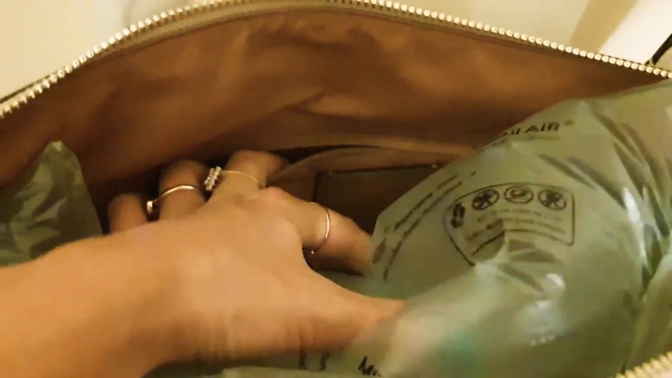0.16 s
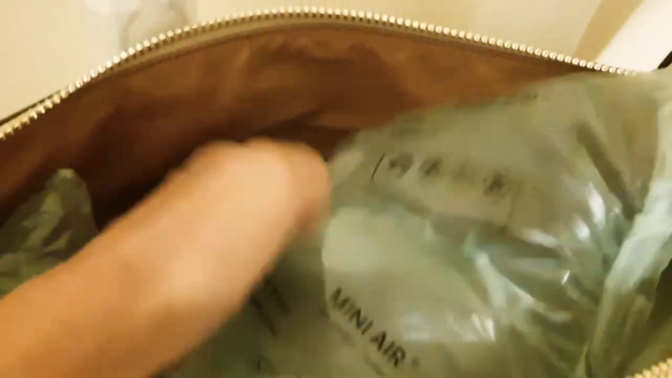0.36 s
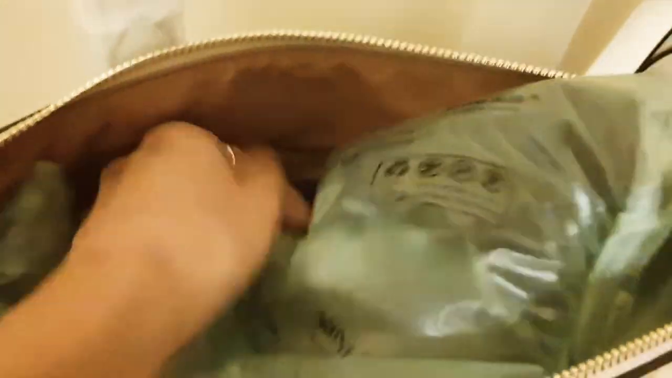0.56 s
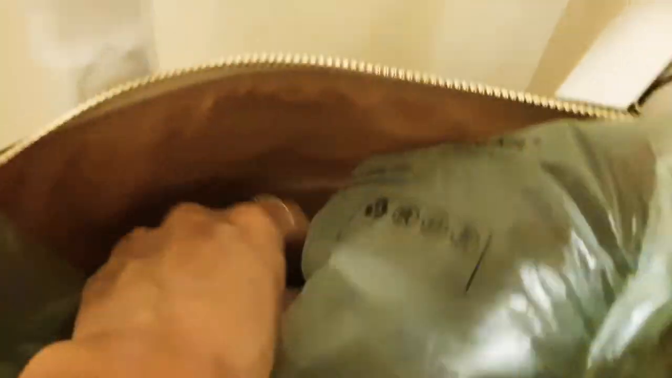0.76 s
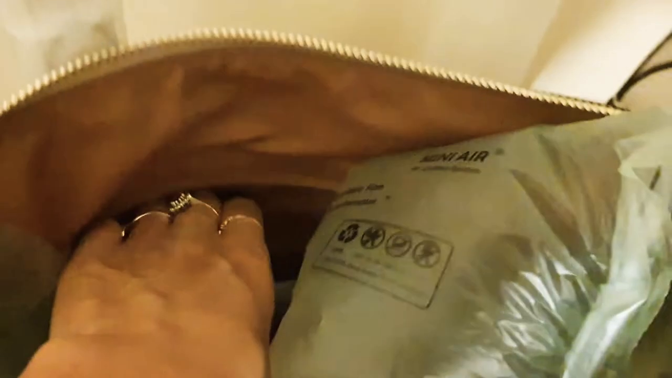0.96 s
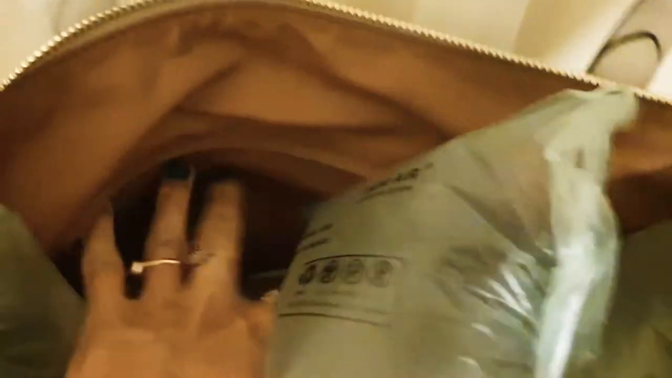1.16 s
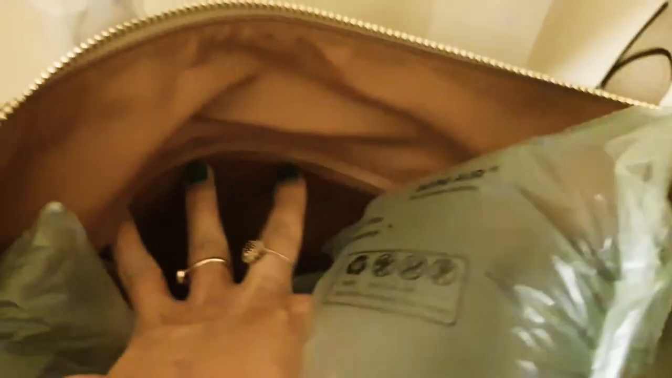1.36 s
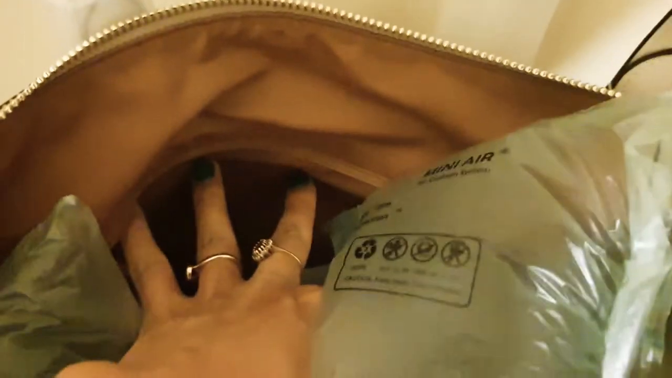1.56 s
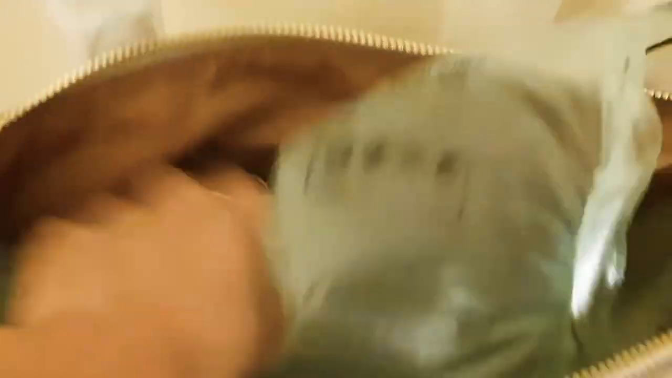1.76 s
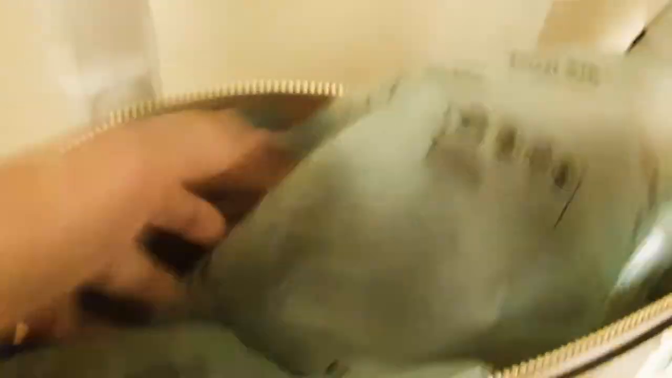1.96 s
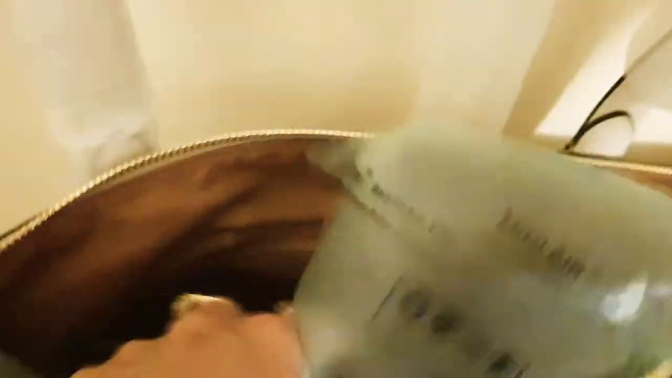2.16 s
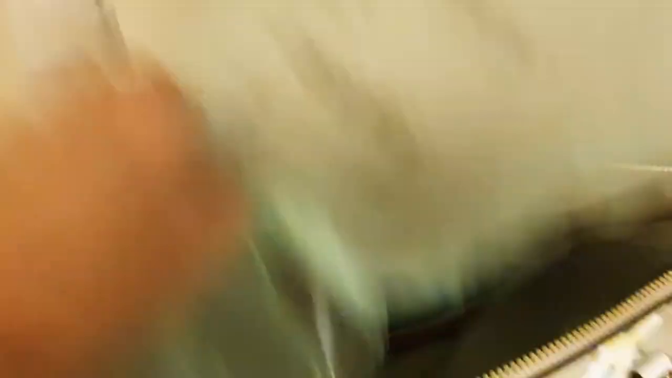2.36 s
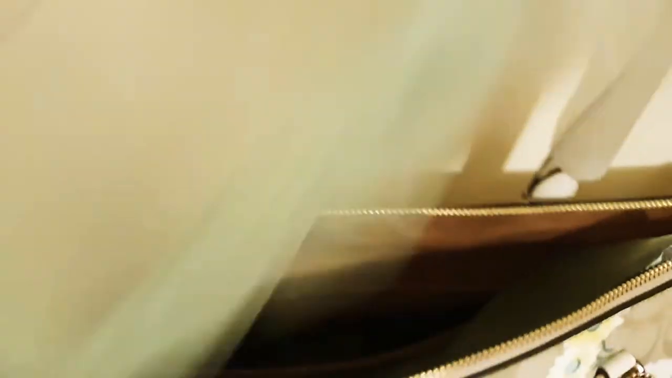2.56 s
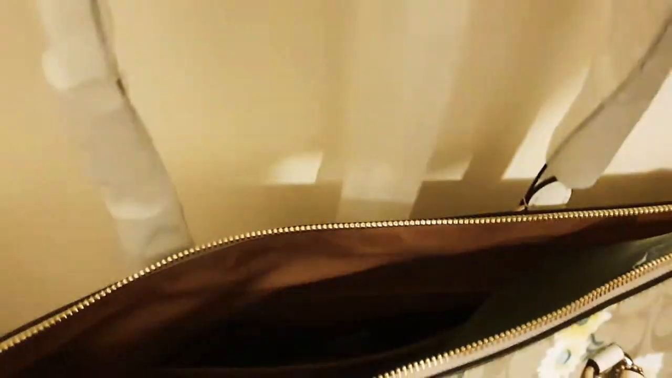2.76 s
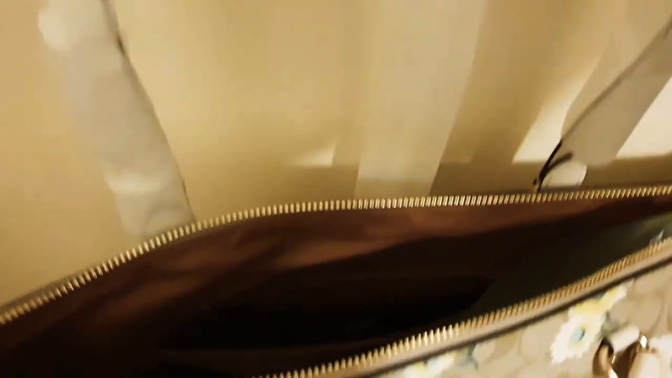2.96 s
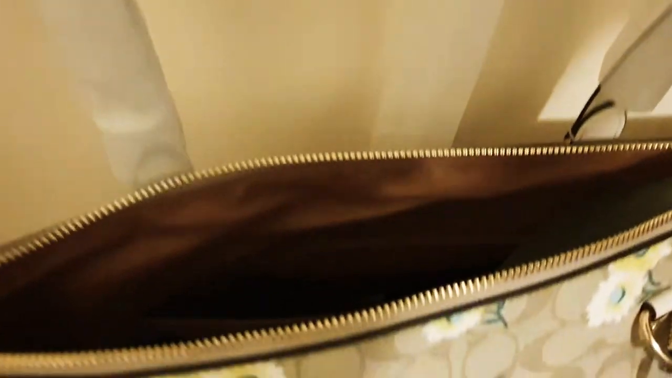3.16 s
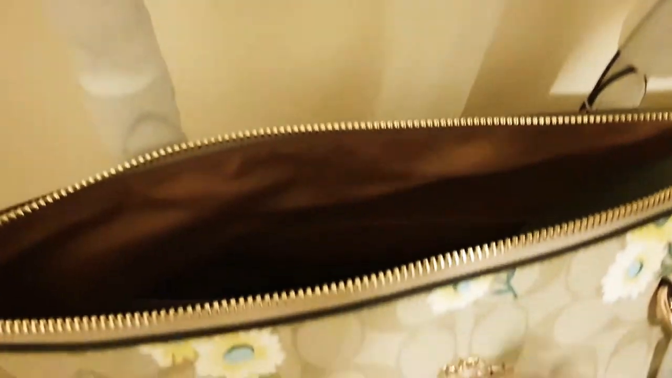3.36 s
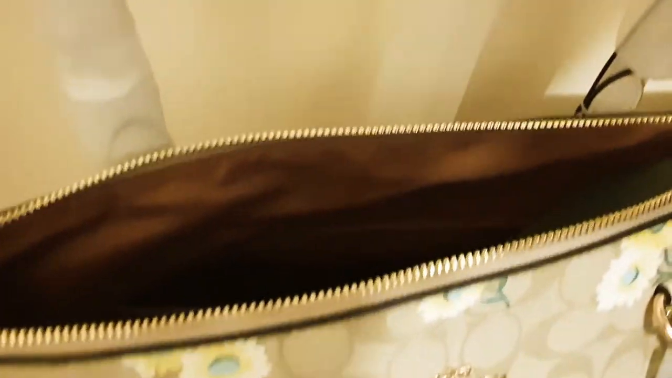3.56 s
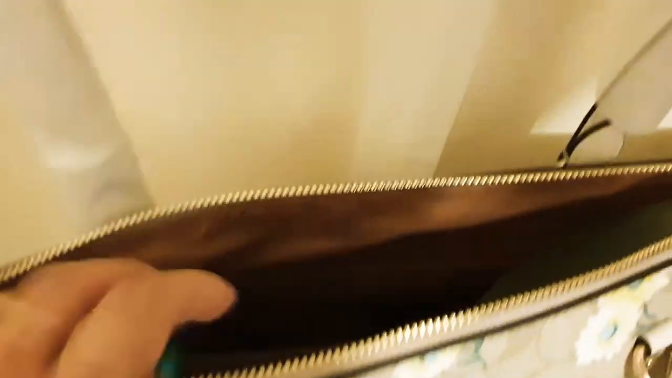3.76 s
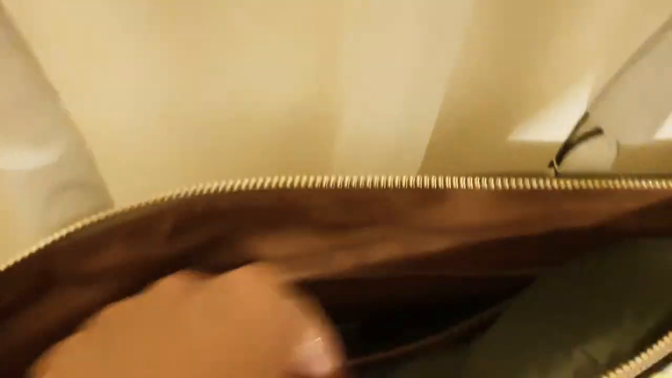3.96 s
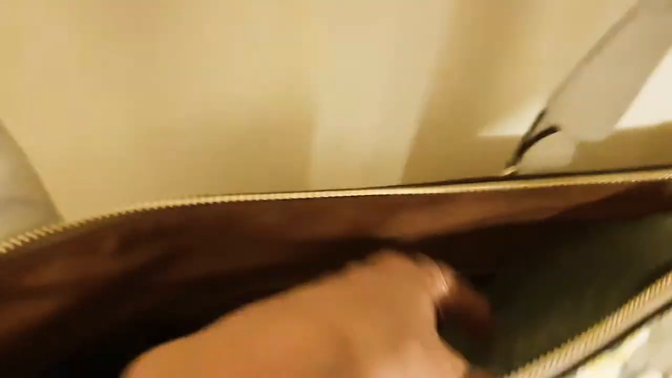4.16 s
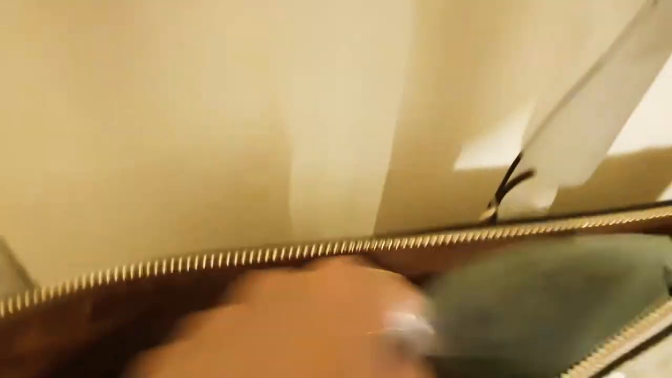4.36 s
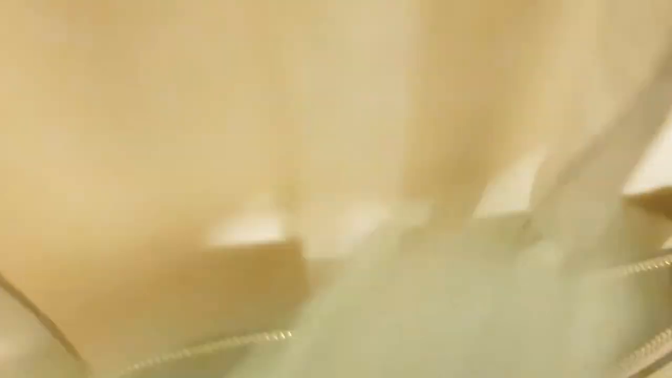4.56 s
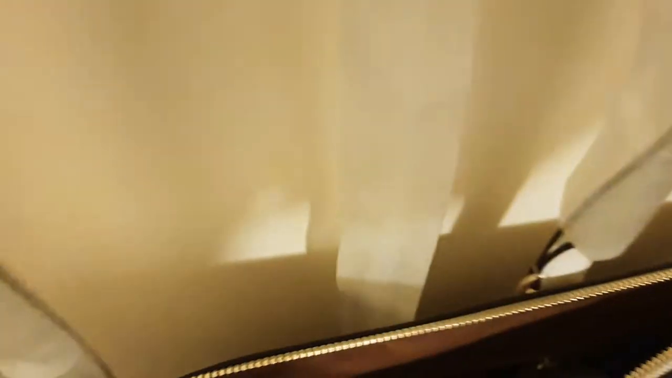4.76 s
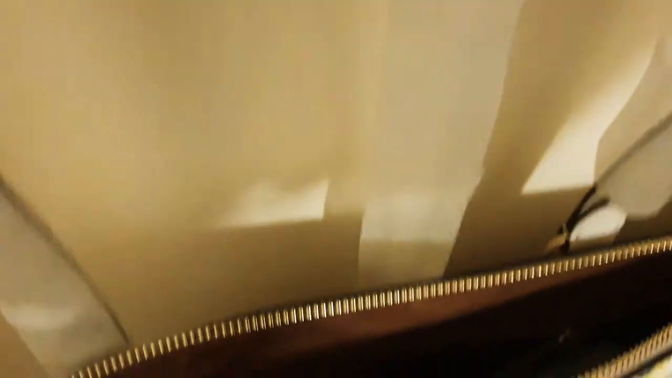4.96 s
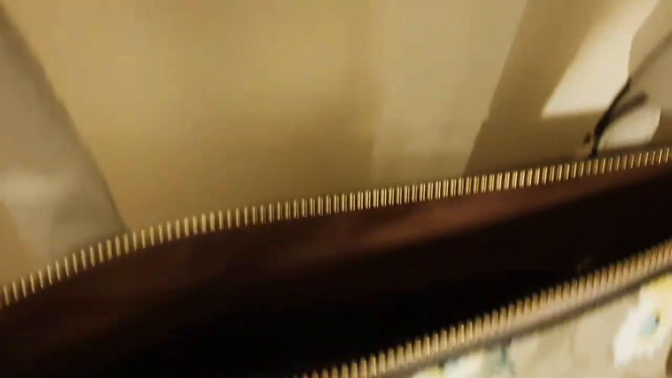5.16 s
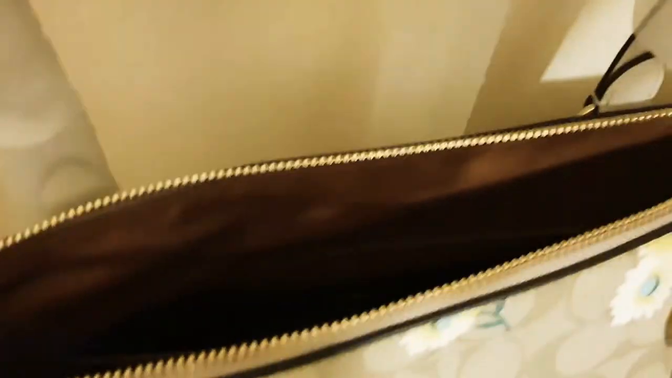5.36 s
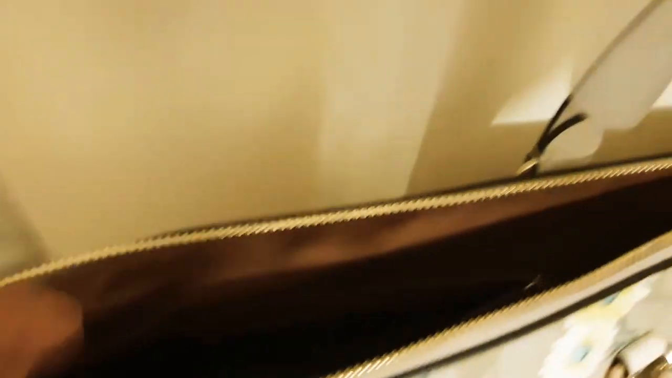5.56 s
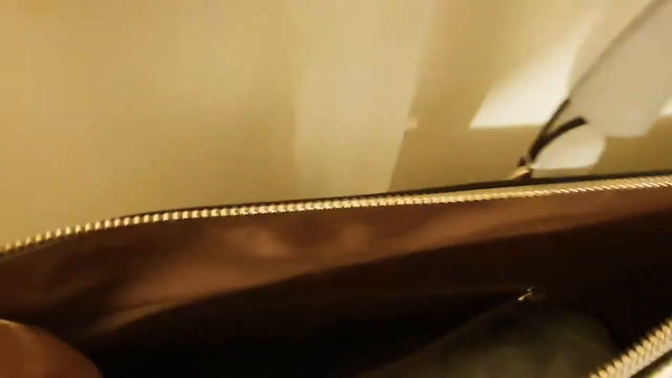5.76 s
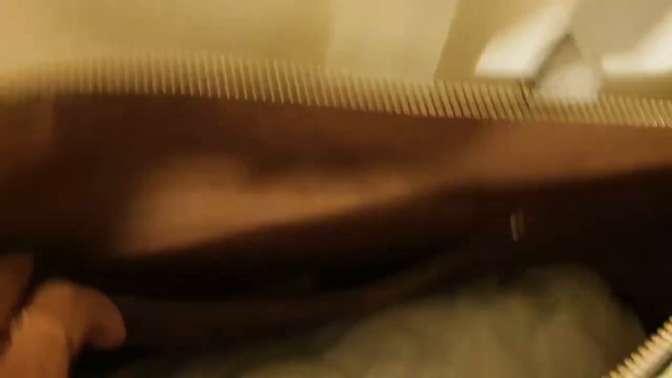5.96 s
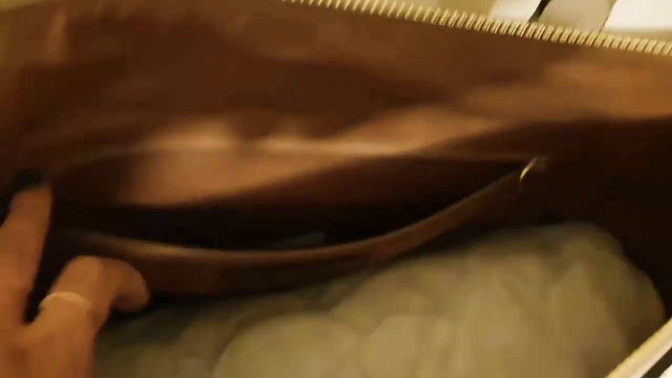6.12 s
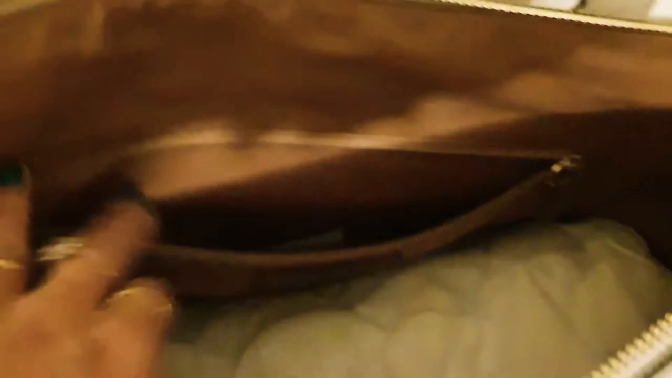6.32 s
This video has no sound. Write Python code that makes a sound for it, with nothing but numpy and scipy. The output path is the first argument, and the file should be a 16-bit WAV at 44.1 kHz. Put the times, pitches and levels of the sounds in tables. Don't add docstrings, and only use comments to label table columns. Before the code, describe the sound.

A close stereo pickup in a small, quiet, fairly dead room, with faint low hum and soft air hiss underneath. From 0 s a hand works an inflated plastic pillow inside a bag: clumps of bright crackle, coarser folds and single sharp snaps, swelling around 0.4, 0.7 and 1.1 s, easing near 1.6 s. From 1.8 s it grows again, peaking at 2.25-2.65 s in a loud crunch with hard snaps and hollow, low pops of taut skin and soft bag thuds. It drops abruptly by 2.8 s. Lighter, thinner rustles run from 3.05 to 3.7 s as the pillow is laid down, then a lull. From 4.2 s crackle returns, bursting at about 4.6 s as a second pillow is pulled out, with lighter crinkles at 4.9-5.3 s. Afterwards only sparse faint ticks and tiny stirs remain, to 6.4 s, sound leaning slightly left.

```python
import sys
import numpy as np
from scipy import signal
from scipy.io import wavfile
from scipy.ndimage import uniform_filter1d

SR = 44100
rng = np.random.default_rng(int(sys.argv[2]) if len(sys.argv) > 2 else 0)


def master(y):
    cut = np.clip(np.atleast_2d(y).T, -1, 1)
    pcm = np.round(cut * 32767)
    wavfile.write(sys.argv[1], SR, pcm.astype(np.int16))


def amplitude_ratio(level_db):
    exponent = np.asarray(level_db, float) / 20
    return 10 ** exponent


N = 281799
TIME = np.arange(N) / SR

# [t/s, lead of the left port/samples, left-right level/dB]
FILM_PLACE = [(0, 5.5, 3.5), (.62, 9.5, 5), (1.3, 9, 5), (1.6, 15, 4), (2.46, 16.5, 4), (2.601, 10.5, 5.5),
              (2.8, 16, 4), (3.1, 4, 2), (3.862, 7.5, 1), (4.2, 17, 3.5), (4.5, 15.5, 4), (4.798, 14, 3.5),
              (5.05, -3.5, -0.5), (5.699, -4, 0), (6.03, 15, 2), (6.39, 18, 7)]
# [f/Hz, density level/dB per Hz]
TICK_SPECTRUM = [(2100, -23.5), (3400, -4), (4400, 0.5), (6570, 3), (9390, -6.5), (11800, -3),
                 (14300, -0.5), (16400, -6.5)]
# [f/Hz, density level/dB per Hz]
FOLD_SPECTRUM = [(290, -42.5), (520, -18), (720, -8.5), (890, -8.5), (1250, -5), (1550, -7.5), (2000, -9.5),
                 (2700, -6.5), (3300, -8), (4200, -16.5), (6000, -29.5)]


def evened(x):
    return x / np.sqrt(np.mean(x ** 2) + 1e-20)


def follow(rows, column=1):
    rows = np.asarray(rows, float)
    return np.interp(TIME, rows[:, 0], rows[:, column])


def add(mix, at, sound):
    part = mix[:, max(at, 0):][:, :sound.shape[1]]
    part += sound[:, :part.shape[1]]


def colour(points, uneven_db=0, size=2048):
    hz, db = np.transpose(points)
    db = db + uneven_db * rng.standard_normal(len(db))
    grid_hz = abs(np.fft.fftfreq(size, 1 / SR)) + 1
    gain_db = np.maximum(np.interp(np.log(grid_hz), np.log(hz), db), -70)
    log_gain = np.log(amplitude_ratio(gain_db))
    minimum_phase = -signal.hilbert(log_gain).imag
    taps = np.fft.ifft(np.exp(log_gain + 1j * minimum_phase)).real[:size // 2]
    return taps / np.linalg.norm(taps)


def scatter(t60, wet_db):
    t = np.arange(min(int(t60 * SR), 4000)) / SR
    tail = rng.standard_normal((2, len(t)))
    tail = tail * amplitude_ratio(-60 * t / t60) * np.minimum(t / 0.0002, 1)
    tail *= amplitude_ratio(wet_db) / np.linalg.norm(tail, axis=1, keepdims=True)
    tail[:, 0] = 1
    return tail / np.sqrt(1 + amplitude_ratio(2 * wet_db))


def pushes(rows, still_db):
    edge_db, roundness = -20.5, 1.81
    t = TIME[::44]
    peak_s, rise_s, fall_s, db = np.transpose(rows)[:, :, None]
    away = np.where(t < peak_s, (peak_s - t) / rise_s, (t - peak_s) / fall_s)
    arches = amplitude_ratio(2 * (db + edge_db * np.minimum(away, 4) ** roundness))
    power = arches.sum(axis=0) + amplitude_ratio(2 * still_db)
    return np.interp(TIME, t, 10 * np.log10(power))


def depth(out_db, in_db):
    # [t/s, share/0-1]
    inside = [(0, 0.77), (1.0, 0.83), (1.5, 1), (1.75, 0.72), (2.3, 0.99), (2.62, 0.66), (2.75, 0.7),
              (3.0, 0.1), (3.85, 0.5), (3.95, 1), (4.58, 0.93), (4.72, 0.49), (5.05, 0.06), (5.3, 0.27),
              (5.7, 0.54), (5.8, 1), (6.1, 0.83), (6.39, 0.4)]
    return out_db + (in_db - out_db) * follow(inside)


def house(tick_db):
    # [f/Hz, density level/dB per Hz]
    hum_spectrum = [(18, -39), (30, -8), (72, -5.5), (88, -6), (102, -1.5), (114, -15.5), (130, -10.5),
                    (247, -42), (278, -14.5), (300, -42), (390, -67), (660, -120)]
    # [f/Hz, density level/dB per Hz]
    wall_spectrum = [(110, -24), (150, -11), (190, 6.5), (230, 1), (320, -38.5)]
    # [f/Hz, density level/dB per Hz]
    air_spectrum = [(150, -40), (250, 0), (378, -0.5), (907, -7.5), (1100, -9), (4560, -12), (6330, -16.5),
                    (8920, -19), (15200, -72)]
    # [t/s, level/dB]
    thuds = [(0.0, -46), (1.1, -46), (1.22, -35.5), (1.51, -37), (1.85, -47), (2.26, -39), (2.65, -30),
             (4.61, -37), (5.8, -41), (5.95, -43), (5.62, -46.5), (6.07, -49.5)]
    thud_rise_s, thud_fall_s = 0.16, 0.065

    common, apart, air_left, air_right, leather = rng.standard_normal((5, N))
    hum = np.array([common + 0.76 * apart, common - 0.87 * apart])
    hum = signal.oaconvolve(hum, colour(hum_spectrum, size=8192)[None])[:, :N]
    hum_db = pushes([(s, thud_rise_s, thud_fall_s, db) for s, db in thuds], still_db=-50)

    wall = signal.oaconvolve(leather, colour(wall_spectrum, size=8192))[:N]
    wall_db = depth(-66, -48) + 0.88 * (tick_db + 35)
    wall_gain = amplitude_ratio(wall_db) + amplitude_ratio(-69)

    air = signal.oaconvolve(np.array([air_left, air_right]), colour(air_spectrum)[None])[:, :N]
    return evened(hum) * amplitude_ratio(hum_db) + wall * wall_gain + air * amplitude_ratio(-61.5)


def drift(per_s):
    size = max(int(SR / per_s), 1)
    noise = uniform_filter1d(rng.standard_normal(N), size)
    return evened(uniform_filter1d(noise, size))


def creases(per_s, spread_db, clump_db):
    size_db = spread_db * np.minimum(rng.exponential(1, N), 5) + clump_db
    size = amplitude_ratio(size_db) * rng.choice([-1., 1.], N)
    share = np.clip(per_s / SR, 1e-4, 1)
    return evened(size) * (rng.random(N) < share) / np.sqrt(share)


def ports(at, size, pan_db, shift):
    margin = 50
    out = np.zeros((2, N + 200))
    late = np.round(follow(FILM_PLACE)[at] + shift).astype(int)
    np.add.at(out[0], at + margin, size * amplitude_ratio(pan_db / 2))
    np.add.at(out[1], at + margin + late, size * amplitude_ratio(-pan_db / 2))
    return out[:, margin:N + margin]


def crackle(clicks, spectrum, level_db, t60, wet_db, shade_db, shift, uneven_db, count=48):
    step = int(0.006 * SR)
    size = clicks * amplitude_ratio(level_db)
    at = np.flatnonzero(size)
    patch = rng.integers(0, count, N // step + 1)
    aside = patch[at // step] % 11 - 5
    pan_db = follow(FILM_PLACE, column=2)[at] + shade_db
    train = ports(at, size[at], pan_db, shift + aside)
    paths = []
    for _ in range(count):
        paths.append(signal.fftconvolve(scatter(t60, wet_db), colour(spectrum, uneven_db)[None]))
    out = np.zeros((2, N))
    for start, k in zip(range(0, N, step), patch):
        add(out, start, signal.fftconvolve(train[:, start:start + step], paths[k], axes=1))
    return out


def film(tick_db):
    # [f/Hz, density level/dB per Hz]
    skin_spectrum = [(53, -22.5), (90, -10), (177, -8), (236, 0.5), (353, -5.5), (472, -6), (600, -7.5),
                     (757, -5), (900, -24.5), (1170, -64), (1980, -120)]
    busy = amplitude_ratio(0.35 * (tick_db + 31))
    clumps_db = 1.3 * drift(45) + 3.0 * drift(320)

    clicks = creases(4000 * busy, 2.55, 0.5 * clumps_db)
    ticks = crackle(clicks, TICK_SPECTRUM, tick_db - 0.4, 0.026, 0.5, 0.17, 0, uneven_db=1.2)
    top = signal.sosfiltfilt(signal.butter(4, 8400, "high", fs=SR, output="sos"), ticks)
    dull_db = 0.1 * np.clip(tick_db + 34, -25, 0)
    ticks = ticks + top * (amplitude_ratio(dull_db) - 1)

    fold_db = tick_db + depth(-2.5, 0.43)
    folds = crackle(clicks, FOLD_SPECTRUM, fold_db, 0.036, 1.0, 0.18, 2.5, uneven_db=0.5)

    flaps = creases(800 * busy, 2.4, 0.4 * clumps_db)
    skin_db = tick_db + depth(-25, -1)
    skin = crackle(flaps, skin_spectrum, skin_db, 0.067, 0, -0.05, 3.3, uneven_db=0.5)
    return ticks + folds + skin


def at_ports(s, sound, spread):
    times, late, pan_db = np.transpose(FILM_PLACE)
    lag = int(np.interp(s, times, late) + spread)
    pair = sound * amplitude_ratio(np.interp(s, times, pan_db) * np.array([[0.5], [-0.5]]))
    pair = np.pad(pair, ((0, 0), (0, 40)))
    return np.array([np.roll(pair[0], max(-lag, 0)), np.roll(pair[1], max(lag, 0))])


def snaps():
    # [t/s, peak level/dB, folds
    # above it/dB]
    single_snaps = [(0.0618, -18.5, -9), (0.1362, -26, -9), (0.1565, -22, -22), (0.219, -26, -5),
                    (0.4534, -16, -25), (0.657, -13.5, -25), (0.7517, -16, -7), (0.835, -14, -5), (0.95, -14, -12),
                    (1.021, -15.5, -0.5), (1.073, -31, -12), (1.0965, -6.5, -5.5), (1.1932, -24, 8),
                    (1.3967, -25, 0.5), (1.507, -8.5, -3.5), (1.709, -30, 5), (1.8733, -9.5, -12),
                    (1.916, -10, -24), (2.258, -10.5, 1), (2.242, -21, 7), (2.328, -2, -14), (2.549, -16, 1.5),
                    (2.757, -12.5, -13.5), (3.5412, -14, -8), (4.6947, -11.5, -38), (4.811, -15, -15),
                    (4.9005, -24, -15), (4.935, -20, -19), (5.047, -13, -32), (5.1781, -15, -18),
                    (0.0315, -22, -10), (1.3334, -34, -25), (1.4457, -32, 10.5), (1.6136, -39, 0),
                (2.8273, -30, -21), (2.9118, -46, -8), (3.6374, -41, 4), (3.8393, -39, 1),
                (3.914, -34.5, -20), (3.939, -31, -24), (4.055, -47, -21), (4.1842, -40, 7.5),
                (4.2198, -32, -4.5), (4.8467, -19, -11), (5.417, -28, -13.5), (5.485, -42, 1),
                (5.562, -39, -5), (5.5953, -26, -20), (5.666, -40, -10), (5.799, -43, -11),
                (5.8666, -49, -9), (5.895, -23.5, -34), (5.933, -34, -6), (5.9988, -36, -4),
                (6.022, -28, -18), (6.039, -36, 1), (6.0675, -44, -8), (6.076, -24.5, -24),
                (6.173, -31, -19), (6.276, -34.5, -14),
                    (0.2932, -22, -9), (0.4074, -24, -14), (0.4878, -21, -16), (0.7744, -16, -14),
             (0.8919, -22, -14), (0.9477, -19, -14), (1.1264, -23, -14), (1.2244, -23, -16),
             (2.4494, -10, -14), (2.6414, -13, -10), (3.6994, -22, -18), (3.9244, -39, -14),
             (3.932, -42, -14), (4.5586, -13, -14), (4.9424, -19, -16), (5.0574, -23, -16),
             (5.0844, -19, -14), (5.282, -28, -15), (5.2874, -17, -14), (5.8491, -49, -14)]
    t = np.arange(500) / SR
    out = np.zeros((2, N))
    for s, db, fold_db in single_snaps:
        volley = rng.standard_normal(len(t)) * amplitude_ratio(-60 * t / 0.009) * np.minimum(t / 0.0015, 1)
        volley[50] += 2.5
        tick = amplitude_ratio(db + 9.5) * colour(TICK_SPECTRUM, uneven_db=4.0)
        fold = amplitude_ratio(db + fold_db + 17.0) * colour(FOLD_SPECTRUM, uneven_db=0.5)
        crack = np.convolve(tick + fold, volley / np.linalg.norm(volley))[None]
        crack = signal.fftconvolve(scatter(0.034, -0.87), crack)
        add(out, round(s * SR) - 24, at_ports(s, crack, rng.integers(-3, 4)))
    return out


def pops():
    # [t/s, peak level/dB, f/Hz]
    skin_pops = [(0.289, -16, 249), (0.394, -16, 237), (0.774, -22, 236), (1.019, -16.5, 241),
                 (1.086, -13, 276), (1.186, -11, 268), (1.217, -14, 143), (1.308, -10, 243), (1.444, -14, 606),
                 (1.505, -14.5, 162), (1.83, -25, 190), (1.929, -14, 203), (2.238, -12, 700), (2.264, 0, 249),
                 (2.325, 0, 690), (2.422, -5.5, 800), (2.458, -12, 483), (2.528, -17, 194), (2.546, -12, 495),
                 (2.57, -3, 482), (2.612, -3, 720), (2.639, -15, 505), (3.331, -27.5, 194),
                 (3.957, -29.5, 181), (4.317, -15, 620), (4.421, -27, 268), (4.468, -22, 248),
                 (4.63, -16.5, 260), (5.772, -30.5, 189), (5.881, -35, 189),
                 (0.249, -27, 307), (0.404, -18, 292), (0.68, -45, 277), (0.825, -22, 271), (0.946, -18, 739),
            (1.394, -27, 401), (1.507, -11.5, 310), (1.827, -13, 694), (1.854, -12.5, 255),
            (2.034, -20, 366), (2.345, -1, 705), (3.242, -24, 820), (3.413, -24, 785), (4.357, -33, 258),
            (4.53, -11, 650), (4.57, -14, 703), (4.76, -27.5, 183), (3.279, -33, 190), (0.719, -25.5, 242),
            (4.555, -11, 580), (4.545, -10, 690), (4.6, -14, 720), (1.25, -32, 560), (5.594, -44, 175),
                 (0.407, -17, 630), (.721, -35, 627), (.821, -25, 544), (1.124, -20, 802), (1.217, -12, 620),
              (1.331, -23, 684), (1.811, -19, 681), (1.926, -28, 473), (2.12, -32, 606), (2.253, -11, 250),
              (2.326, -6, 260), (2.337, -13, 250), (2.352, -12, 720), (2.371, -28, 248), (2.385, -32, 300),
              (2.526, -13, 580), (2.534, -18, 250), (2.553, -12, 563), (2.576, -5, 710),
              (3.102, -27.5, 875), (3.217, -34, 990), (4.298, -30, 762), (4.455, -15, 630),
              (5.084, -28, 1250), (5.097, -30, 1190), (5.115, -37, 1350)]
    out = np.zeros((2, N))
    for s, db, hz in skin_pops:
        turns = np.arange(int(6 * SR / hz)) * hz / SR
        ring = np.sin(2 * np.pi * turns) * turns ** 2 * np.exp(-turns / 0.39)
        ring = amplitude_ratio(db - 4.5) * ring[None] / abs(ring).max()
        ring = signal.fftconvolve(scatter(0.033, -3.5), ring)
        at = round((s + 0.00403 - 0.7 / hz) * SR)
        add(out, at, np.array([amplitude_ratio(0.9) * ring[0], amplitude_ratio(-0.9) * np.roll(ring[1], 14)]))
    return out


def scene():
    # [peak t/s, rise/s, fall/s, tick level/dB]
    film_pushes = [(0.028, 0.76, 0.11, -39), (0.242, 0.051, 0.04, -35), (0.39, 0.22, 0.11, -29.5),
                   (0.519, 0.071, 0.14, -37.5), (0.699, 0.11, 0.28, -29.5), (0.758, 0.055, 0.059, -28.5),
                   (0.95, 0.039, 0.15, -29.5), (1.09, 0.069, 0.084, -24), (1.207, 0.035, 0.044, -26),
                   (1.226, 0.14, 0.27, -30.5), (1.507, 0.098, 0.068, -36), (1.832, 0.11, 0.19, -27.5),
                   (1.916, 0.26, 0.077, -27.5), (2.04, 0.2, 0.11, -29), (2.237, 0.14, 0.12, -24),
                   (2.345, 0.022, 0.042, -22.5), (2.372, 0.32, 0.41, -23.5), (2.656, 0.64, 0.083, -26),
                   (2.74, 0.058, .06, -38), (2.743, 0.008, 0.04, -51.5),
                   (2.941, 0.587, 0.14, -45.5), (3.096, 0.1, 0.053, -35.5), (3.178, 0.11, 0.17, -34),
              (3.267, 0.18, 0.16, -32.5), (3.375, 0.073, 0.052, -33.5), (3.42, 0.034, 0.047, -34.5),
              (3.59, .05, .06, -53.5), (3.487, 0.08, 0.09, -31.5), (3.55, 0.039, 0.022, -35.5),
              (3.697, 0.049, 0.042, -34.5), (3.831, 0.54, 0.074, -50.5), (3.949, 0.061, 0.12, -53.5),
              (4.226, 0.036, 0.14, -41), (4.312, 0.07, 0.5, -33), (4.328, 0.046, 0.027, -35.5),
              (4.58, 0.19, 0.15, -22), (4.59, 0.4, 0.4, -43.5), (4.05, 0.22, 0.19, -54),
              (4.99, 0.038, 0.11, -36), (4.706, 0.026, 0.062, -31), (4.834, 0.087, 0.056, -38),
              (4.924, 0.052, 0.043, -40), (5.09, 0.089, 0.2, -30), (5.18, 0.02, 0.066, -31.7),
              (5.288, 0.43, 0.067, -37), (5.488, 0.13, 0.1, -57.5), (5.631, 0.022, 0.094, -43),
              (5.948, 0.994, 0.065, -59), (6.058, 0.084, 0.085, -48.5), (6.189, 0.03, 0.12, -60),
                   (.875, 0.086, 0.1, -33), (1.399, 0.031, 0.076, -40.5), (2.776, .04, 0.01, -51),
             (5.7, .03, 0.12, -56.5), (1.69, 0.049, .08, -50), (2.86, 0.034, 0.034, -49),
             (2.691, .06, 0.017, -27.5), (3.643, .008, 0.11, -41), (3.76, 0.026, 0.076, -56.5),
             (4.188, 0.0099, 0.11, -46), (5.05, 0.008, 0.06, -34.5), (5.598, 0.006, 0.05, -43.5),
             (5.665, 0.036, 0.023, -46), (6.024, 0.014, 0.031, -52), (6.176, .006, 0.026, -54),
             (.295, .008, 0.023, -31), (4.902, 0.0069, 0.027, -42)]
    tick_db = pushes(film_pushes, still_db=-68)
    near = film(tick_db) + snaps() + pops()
    return signal.oaconvolve(near, scatter(0.055, -15), axes=1)[:, :N] + house(tick_db)


def band_limit(x):
    return signal.sosfilt(signal.butter(12, 17000, fs=SR, output="sos"), x)


def record(dry):
    thin = signal.sosfilt(signal.butter(4, 44, "high", fs=SR, output="sos"), dry)
    treble = signal.sosfiltfilt(signal.butter(2, 9000, "high", fs=SR, output="sos"), thin)
    thin += np.array([[-0.2], [0.22]]) * treble
    low = signal.sosfiltfilt(signal.butter(2, 220, fs=SR, output="sos"), thin)
    thin -= 0.7 * (low - low.mean(0))
    limited = 0.97 * thin / (1 + (thin / 0.97) ** 4) ** 0.25
    edge = signal.firwin(401, 15900, window=("kaiser", 6), fs=SR)
    return band_limit(signal.oaconvolve(limited, edge[None], "same"))


dry = scene()
out = record(dry)
master(out)
```